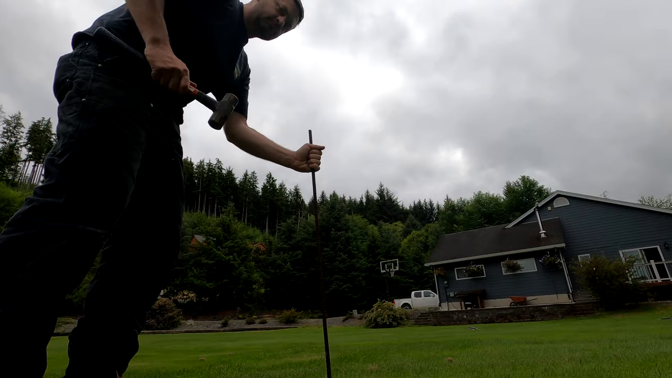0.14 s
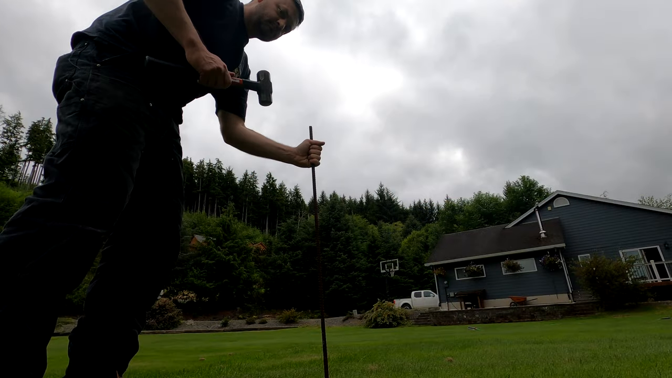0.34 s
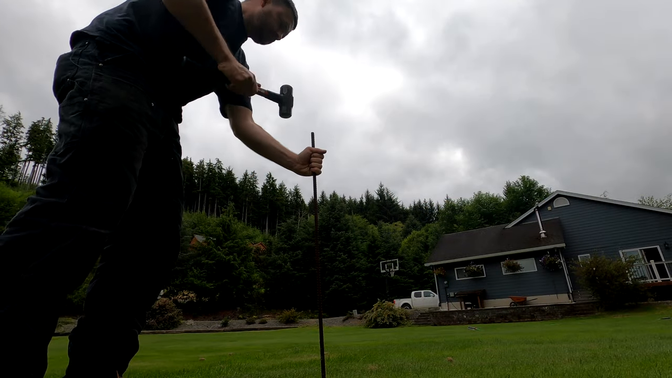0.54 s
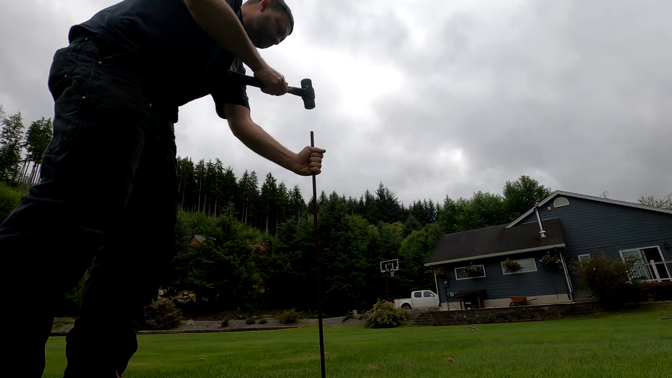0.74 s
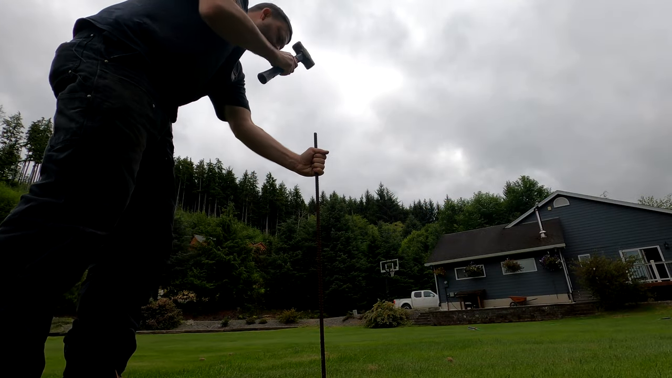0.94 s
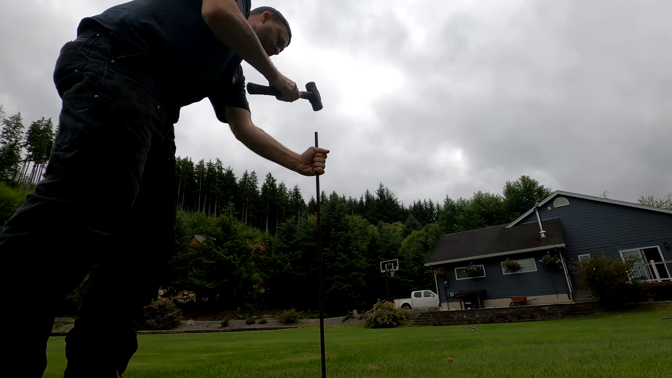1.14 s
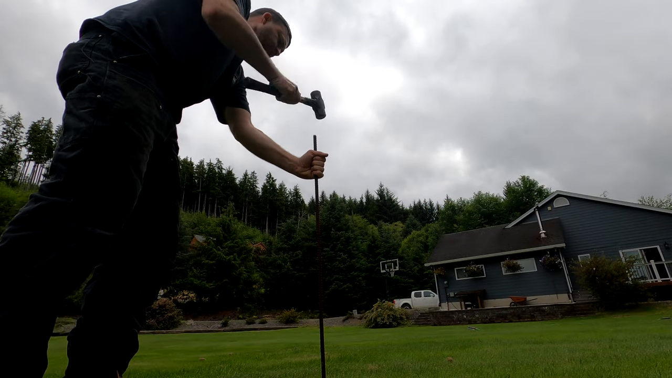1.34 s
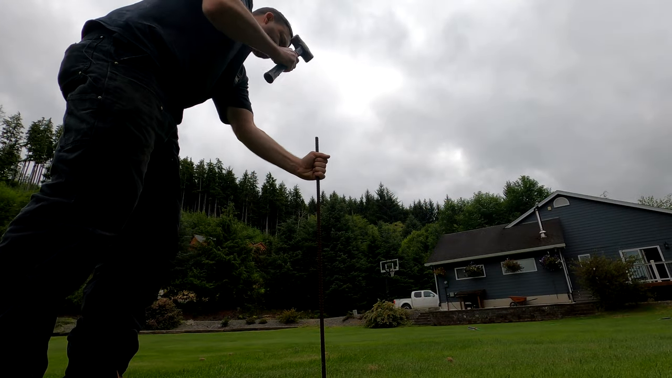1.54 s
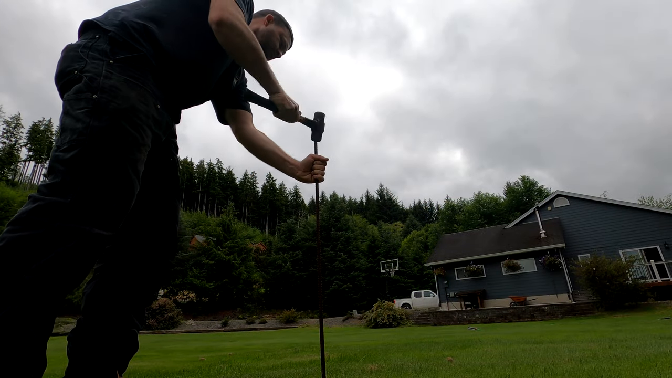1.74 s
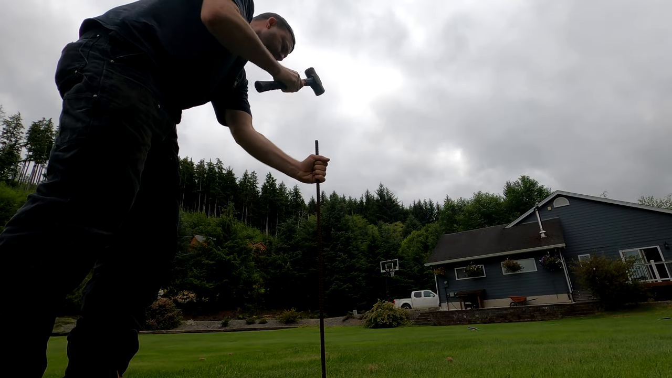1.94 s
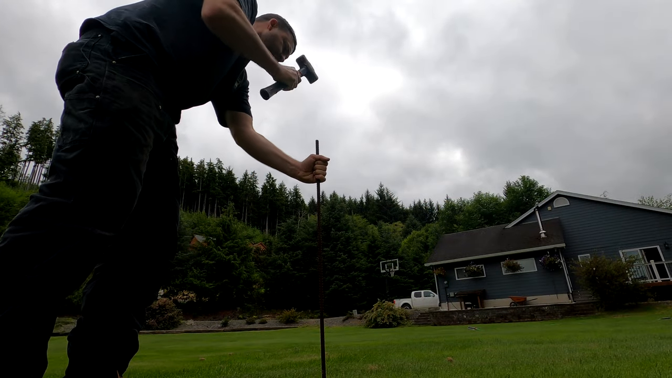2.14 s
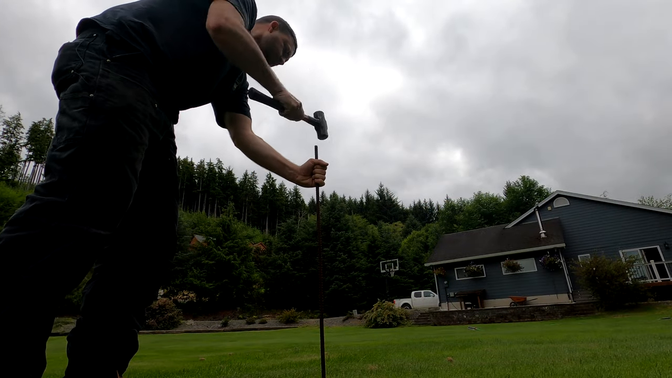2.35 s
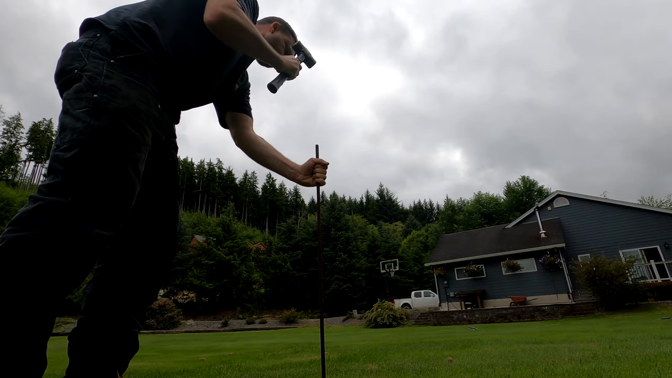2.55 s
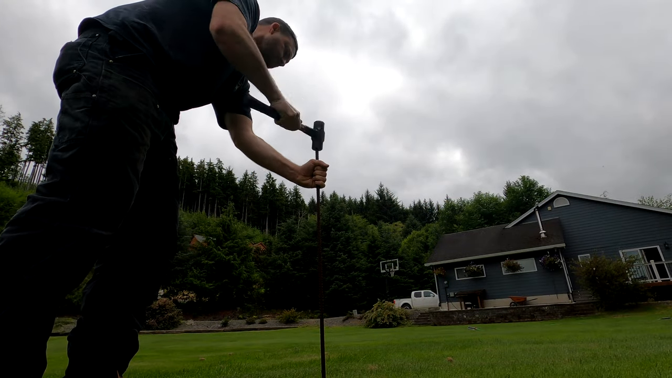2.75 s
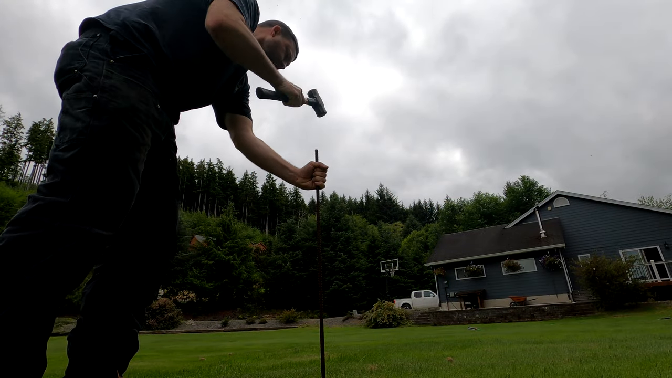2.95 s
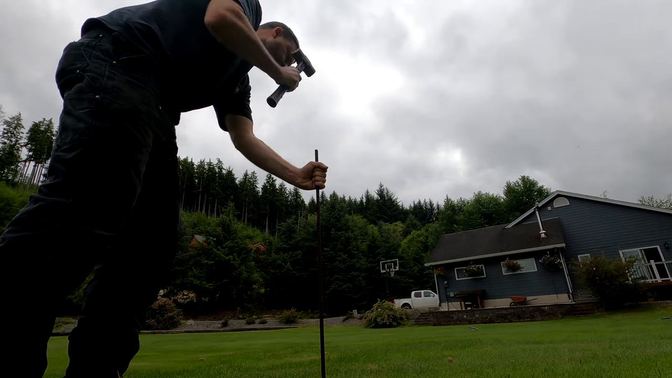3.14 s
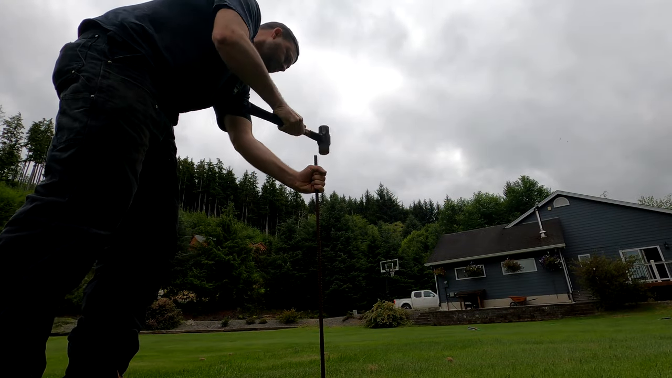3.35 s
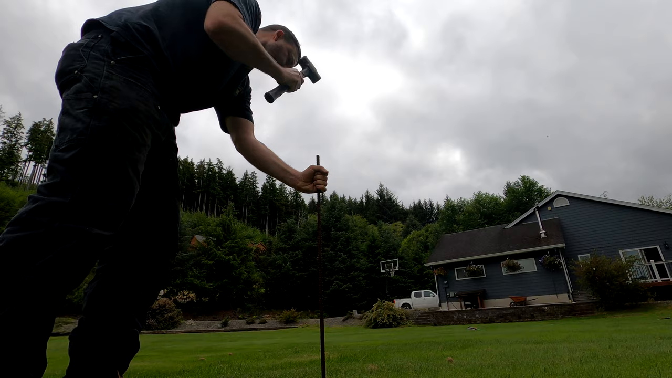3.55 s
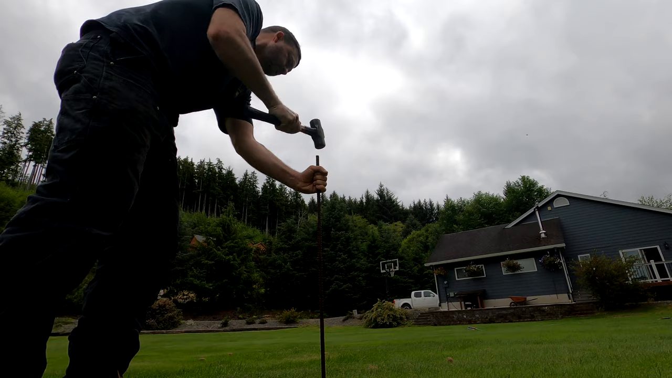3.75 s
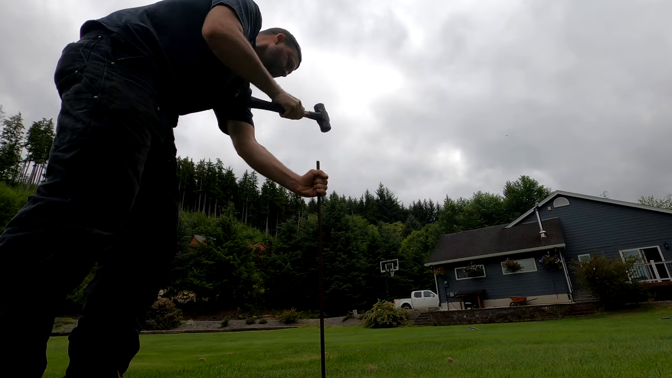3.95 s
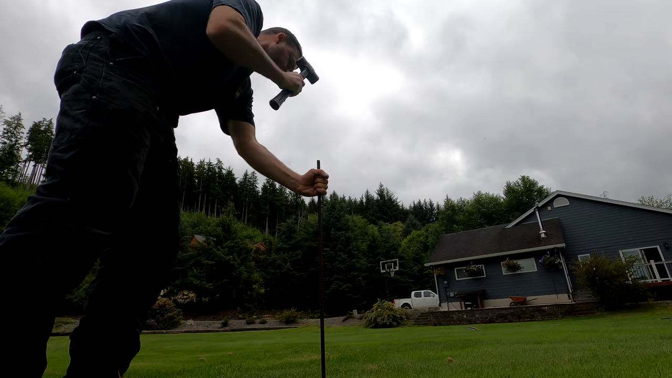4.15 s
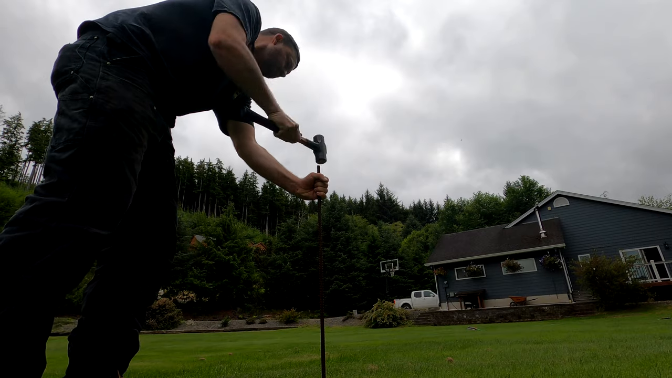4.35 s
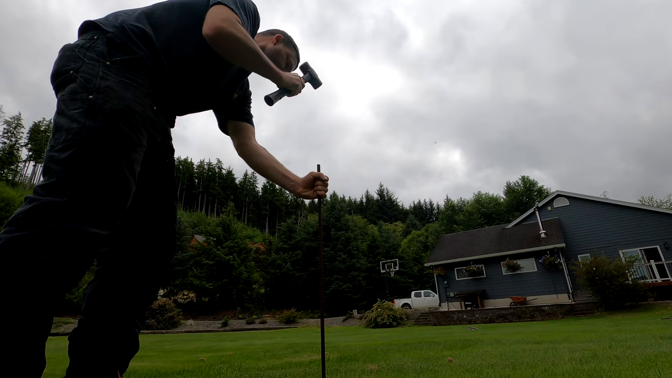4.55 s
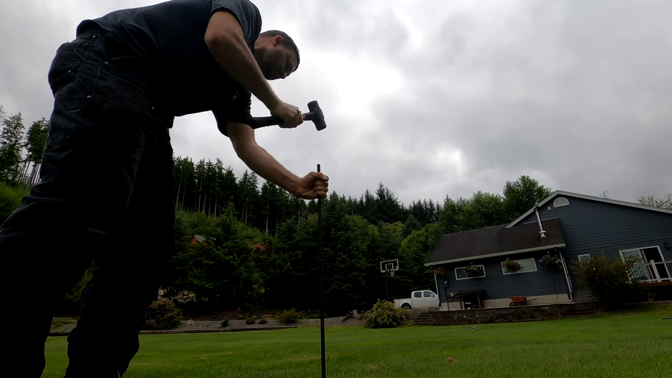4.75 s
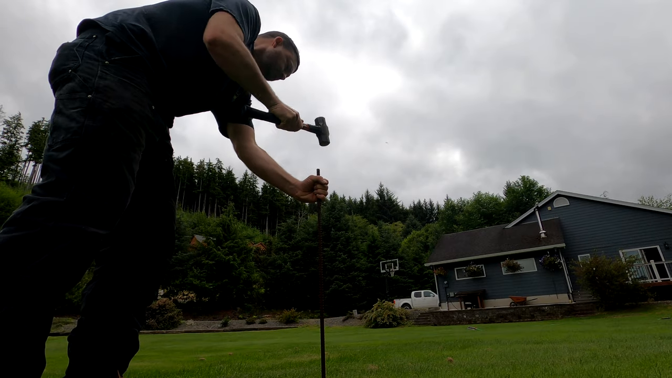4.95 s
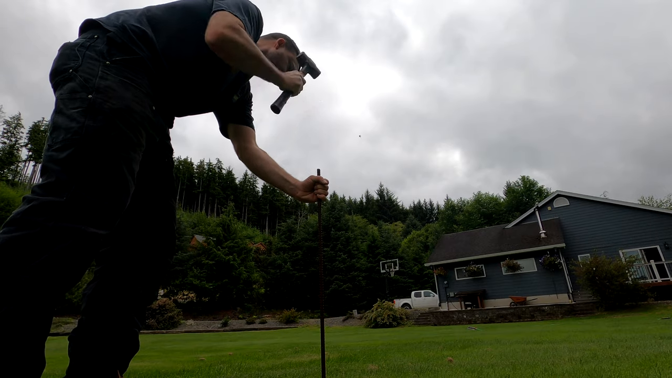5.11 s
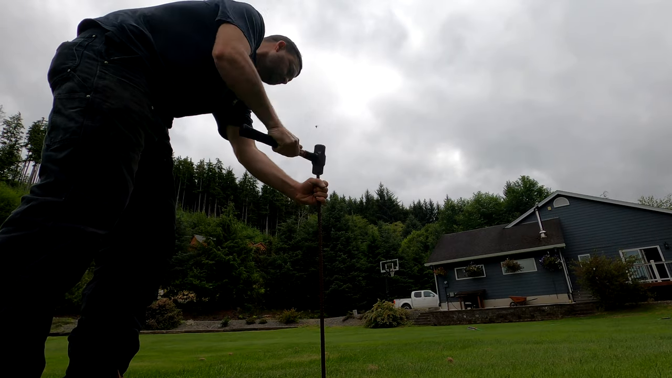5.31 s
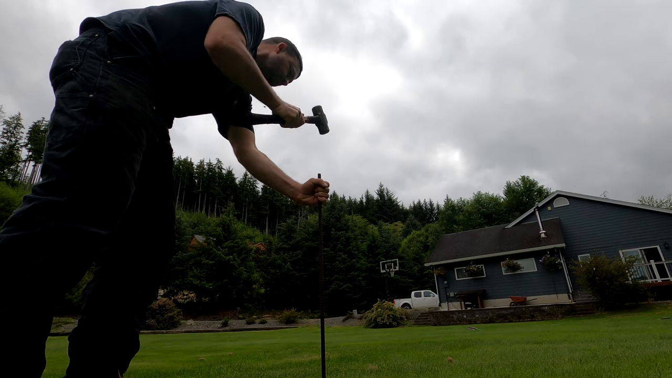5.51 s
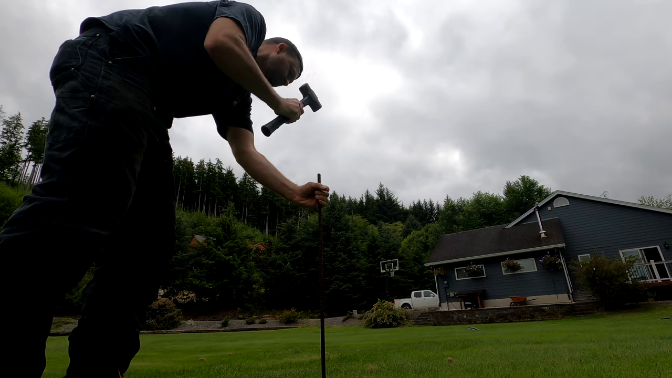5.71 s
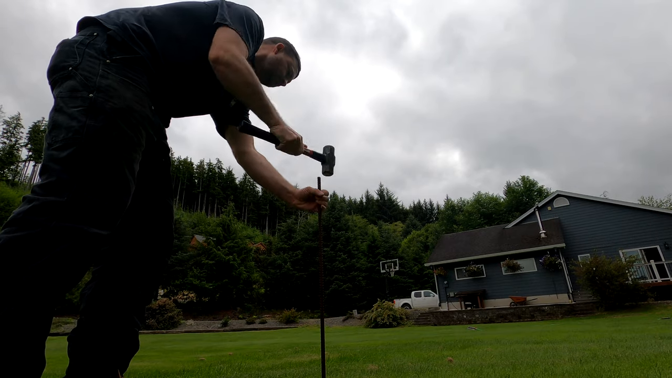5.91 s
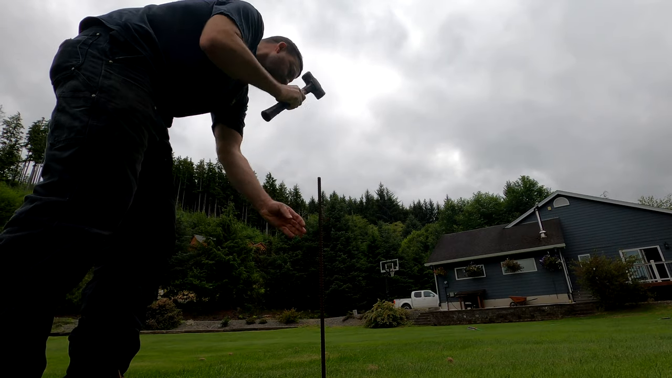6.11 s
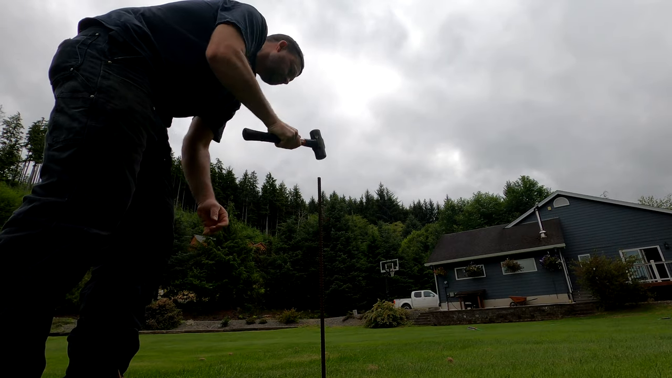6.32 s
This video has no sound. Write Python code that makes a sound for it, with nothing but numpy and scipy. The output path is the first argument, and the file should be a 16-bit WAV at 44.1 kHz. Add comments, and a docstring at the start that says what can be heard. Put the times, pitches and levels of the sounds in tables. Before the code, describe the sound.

Outdoors on a lawn, wind briefly buffets the microphone over the low hum of a distant mower. Then a small sledgehammer hits a steel bar ten times, about two blows a second. Each nearby blow is a sharp crack with a brief, bright ring, a tiny rebound and a soft thud in the soil, followed by a faint echo from a house. The wind rumble returns near the end.

```python
"""Hammering a steel bar into a lawn

A small sledgehammer strikes a hand-held bar and bounces on its tip: steel cracks and rings briefly,
the soil thuds, a house and trees send echoes back. A distant mower hums, a bird chirps once and wind
rumbles on the microphone. The recorder ducks its treble after each blow and widens from mono to stereo."""
import sys
import numpy as np
from scipy import signal
from scipy.io import wavfile

SR = 44100
rng = np.random.default_rng(int(sys.argv[2]) if len(sys.argv) > 2 else 0)


def master_out(mix):
    """Clip the mix to full scale and print it as 16-bit PCM to the path in sys.argv[1]."""
    frames = np.transpose(np.atleast_2d(mix))
    ceiling = np.clip(frames, -1, 1)
    pcm = np.round(ceiling * 32767).astype(np.int16)
    wavfile.write(sys.argv[1], SR, pcm)


N = 281119
TIME_S = np.arange(N) / SR

# Head lands on the tip: (time [s], strength [dB], crack brightness [dB], ring tilt [dB/oct],
# share in plane 1 [0-1], head ring [dB], thud [dB], low favoured pitch [Hz], high favoured pitch [Hz])
BLOWS = [(1.2813, -10, -6, -2, 0.53, -57, -19, 2690, 4900),
         (1.8152, -10, -2, -6.5, 0.41, -45, -19, 4100, 4830),
         (2.322, -10, -4, -4.5, 0.39, -53, -21, 4030, 4680),
         (2.8357, -9.5, -4, 0, 0.37, -42, -18, 2630, 6370),
         (3.3454, -11, -1, -3.5, 0.3, -44.5, -24.5, 2640, 8900),
         (3.8544, -10, -3.5, -6, 0.2, -52.5, -24, 3620, 6890),
         (4.3663, -10.5, 2.5, -9.5, 0.28, -53, -21.5, 3580, 6900),
         (4.8812, -11, 1.5, -9.5, 0.51, -52, -22, 4230, 4760),
         (5.3935, -9, -3.5, -4.5, 0.4, -50.5, -23.5, 3550, 6600),
         (5.893, -11, -5, 0.5, 0.65, -45, -27.5, 2810, 7400)]
# Head touches again: (time [s], crack [dB], ring [dB], thud [dB], low favoured pitch [Hz])
REBOUNDS = [(1.2954, -13.5, -17.5, -23, 2840), (1.3044, -22.5, -15, -41, 3530),
            (1.8309, -17, -10.5, -20, 3460), (2.335, -19.5, -10.5, -22.5, 3900),
            (2.3415, -28.5, -19, -25.5, 4030), (2.8484, -19.5, -12.5, -23, 4700),
            (2.8547, -20, -21.5, -27.5, 4100), (3.3576, -19, -15.5, -21, 3420),
            (3.3622, -26, -21, -25.5, 3570), (3.8655, -24, -10, -25.5, 3670), (4.3761, -25, -13, -26, 3660),
            (4.3803, -22, -28.5, -24, 3440), (4.4068, -40, -50.5, -35.5, 2470),
            (4.8912, -22, -14.5, -25.5, 3480), (5.4043, -17, -13.5, -24, 2980),
            (5.447, -33, -43, -36, 3590), (5.9021, -21.5, -21, -22, 3430)]
def hammer():
    """Blows and rebounds excite bar, contact noise and soil; blows also ring the solid head."""
    blow_s, blow_db, bright_db, tilt_db, plane, head_db, thud_db, low_hz, high_hz = np.transpose(BLOWS)
    bounce_s, bounce_crack_db, bounce_ring_db, bounce_thud_db, bounce_hz = np.transpose(REBOUNDS)
    touch_s = np.r_[blow_s, bounce_s]
    parent = np.searchsorted(blow_s, touch_s, side="right") - 1
    is_bounce = np.arange(len(touch_s)) >= len(blow_s)
    ring_db, crack_db = np.r_[blow_db, bounce_ring_db], np.r_[blow_db + 2, bounce_crack_db]
    # Rebounds crack duller but, glancing, ring the higher modes.
    bright_db = bright_db[parent] + 0.34 * is_bounce * (crack_db - blow_db[parent])
    tilt_db = tilt_db[parent] + 2 * is_bounce
    modes_db = bar_modes(ring_db, tilt_db, plane[parent], [np.r_[low_hz, bounce_hz], high_hz[parent]])
    since_s = np.abs(TIME_S - blow_s[np.maximum(np.searchsorted(blow_s, TIME_S) - 1, 0)])
    choke = np.exp(-(since_s / .03) ** 3)  # head and grip settle on the bar
    bar = choke * bar_ring(touch_s, modes_db, parent)
    contact = choke * rattle(touch_s, ring_db) + crack(touch_s, crack_db, bright_db, since_s)
    head = strike(hz=10000, t60_s=.2, levels_db=head_db, times_s=blow_s)
    return radiate(bar), radiate(contact), head, soil_thud(touch_s, np.r_[thud_db, bounce_thud_db])


# Bending modes of the ribbed bar: (frequency [Hz])
MODE_HZ = [2390, 2685, 2955, 3460, 3560, 4030, 4185, 4685, 4845, 5370, 5535, 6300, 6880, 7095, 7700, 7940,
           8590, 8800, 9740, 10700, 11700, 12300, 13750, 14800]
# Same order: (level [dB], free t60 [s], plane of swing [0 or 1])
MODES = [(-5.5, 0.099, 1), (-1.5, 0.04, 0), (-6.5, 0.056, 1), (-9, 0.15, 0), (-7.5, 0.077, 1),
         (-3, 0.067, 0), (-8, 0.083, 1), (-4, 0.045, 0), (-8.5, 0.074, 1), (-14, 0.066, 0), (-10, 0.12, 1),
         (-6, 0.14, 1), (-12, 0.11, 0), (-8.5, 0.072, 1), (-13, 0.037, 0), (-14, 0.068, 1), (-20, .08, 0),
         (-12, 0.11, 1), (-18.5, 0.51, 1), (-22, 0.034, 1), (-24, 0.025, 1), (-21.5, 0.078, 0),
         (-19.5, .07, 1), (-32, .06, 1)]
def bar_modes(ring_db, tilt_db, plane, favoured_hz, favour_db=5.5, favour_oct=.16):
    """Mode levels per contact, set by plane of swing, tilt and two favoured pitches."""
    levels_db = rng.normal(0, 1.5, (len(ring_db), len(MODES)))  # no two contacts hit the same spot
    for k, (hz, (db, _, mode_plane)) in enumerate(zip(MODE_HZ, MODES)):
        share = plane if mode_plane else 1 - plane
        colour_db = 20 * np.log10(share) + tilt_db * np.log2(hz / 5000)
        for centre_hz in favoured_hz:
            colour_db += favour_db * np.exp(-(np.log2(hz / centre_hz) / favour_oct) ** 2)
        levels_db[:, k] += ring_db - 1.5 + db + colour_db
    return levels_db


# Damping by hand and soil: (time [s], share of free t60 at 3560 Hz [0-1])
GRIP = [(1.2, 0.91), (3.4, 0.63), (3.85, 0.43), (4.9, 0.4), (5.4, 0.62), (5.9, 0.55)]
def bar_ring(touch_s, modes_db, parent, detune=.0027, stifle_db=-5.5, stifle_s=.0017, spread_s=.0007):
    """Each contact rings the bending modes; later touches of the same blow stifle them."""
    t, out = np.arange(int(.09 * SR)) / SR, np.zeros(N + SR)
    pitches_hz = np.array(MODE_HZ) * (1 + detune * rng.standard_normal(modes_db.shape))  # grip, depth
    free_t60_s, sign = np.array(MODES)[:, 1:2], (-1) ** np.arange(len(MODES))
    for start_s, db, hz, blow in zip(touch_s, modes_db, pitches_hz[:, :, None], parent):
        held = np.interp(start_s, *np.transpose(GRIP)) ** (3560 / hz)  # high modes feel the grip less
        decay = amp(-60 * t / (free_t60_s * held))
        ring = (sign * amp(db)) @ (decay * np.sin(2 * np.pi * hz * t))
        for later_s in touch_s[(touch_s > start_s) & (parent == blow)]:
            ring *= amp(stifle_db * np.clip((t + start_s - later_s) / stifle_s, 0, 1))
        i = int(start_s * SR)
        out[i:i + len(t)] += ring * (1 - np.exp(-t / spread_s))  # waves take time to fill the bar
    return out[:N]


# Steel contact, dull and bright parts: (frequency [Hz], level [dB], t60 [s])
CRACK_DULL = [(1300, 2, .007), (1650, 2, .006)]
CRACK_BRIGHT = [(3460, 5, .005), (4550, 5, .005), (6560, -3, 0.0048), (9585, -6, .006),
                (13500, -15.5, .003)]
def crack(touch_s, crack_db, bright_db, since_s, rise_s=63e-6):
    """Steel meets steel: resonances that die within milliseconds."""
    dull = sum(strike(hz, t60, crack_db + db, touch_s) for hz, db, t60 in CRACK_DULL)
    bright = sum(strike(hz, t60, crack_db + bright_db + db, touch_s) for hz, db, t60 in CRACK_BRIGHT)
    return (butter(dull, 5000, "low") + bright) * (1 - np.exp(-(since_s / rise_s) ** 2))


# Chatter spectrum: (frequency [Hz], relative density [dB])
RATTLE_SPECTRUM = [(600, -19), (1200, -6.5), (2000, -8.5), (3500, -1.5), (5000, -9.5), (7500, -8.5),
                   (10000, -17), (12500, -27), (15900, -36)]
def rattle(touch_s, ring_db, t60_s=.065):
    """The head chatters on the tip: a dying noise burst per contact."""
    envelope = signal.lfilter([1], [1, -amp(-60 / (t60_s * SR))], impulses(touch_s, ring_db - 19))
    return envelope * band_noise(RATTLE_SPECTRUM, flicker_db=3, rate_hz=20)[0]


# Soil resonances: (frequency [Hz], level [dB], t60 [s])
SOIL_MODES = [(74.2, 4, 0.03), (167, 2, 0.065), (255, -10, 0.056), (354, -8.5, 0.038), (491, -12, 0.012),
              (765, -13.5, .012)]
def soil_thud(touch_s, thud_db):
    """Soft soil takes the blow and rounds the push."""
    thud = sum(strike(hz, t60, thud_db + db, touch_s) for hz, db, t60 in SOIL_MODES)
    return butter(thud, [35, 900])


def radiate(steel, lawn_delay_s=.0018, lawn_db=-18):
    """A thin bar radiates no bass, the contact is too long for the very top; the lawn reflects."""
    direct = butter(steel, [1405, 19000], order=3)
    return direct + amp(lawn_db) * np.roll(direct, int(lawn_delay_s * SR))


# House and garage faces: (delay [s], level [dB])
WALL_ECHOES = [(0.0706, -28.5), (0.087, -26.5), (.098, -43), (.112, -29)]
def echoes(steel, trees_delay_s=.094, trees_db=-56.5, trees_t60_s=.51):
    """Walls reflect the treble; hedges and trees scatter it into a dying tail."""
    t = np.arange(SR // 2) / SR
    scatter = amp(trees_db - 60 * t / trees_t60_s) * rng.standard_normal((2, len(t)))
    response = np.pad(scatter, ((0, 0), (int(trees_delay_s * SR), 0)))
    for delay_s, db in WALL_ECHOES:
        response[:, int(delay_s * SR)] += amp(db)
    treble = butter(np.gradient(steel), [2200, 11000], order=3)  # siding scatters highs best
    return signal.fftconvolve(treble[None], response)[:, :N]


# Mower moving about: (time [s], level [dB], lift of order 6 [dB], of orders 7-8 [dB], of order 10 [dB])
MOWER_LEVELS = [(0, -36, 9, 6, 11), (.26, -37, 3, 4, 1), (.49, -41.5, 3, 9, 20), (.89, -38, 4, 3, -1.5),
                (2.3, -40.5, -2, -3, -2.5), (4.8, -45.5, 0, -1, 8), (5.35, -43, 0, 5, 15),
                (5.6, -46, 0, -1, 18.5), (5.95, -42, -1, -3, 12.5), (6.37, -45, -4, -4, 2.5)]
# Engine speed: (time [s], firing rate [Hz])
FIRING_RATE = [(0, 26.7), (.26, 25.5), (.49, 25), (.89, 26.5), (1.3, 26.3), (4.4, 26.15), (5.2, 26.7),
               (6.37, 26.3)]
# Exhaust harmonics: (order [1], level [dB])
EXHAUST_ORDERS = [(1, -13.5), (2, -16), (3, -16), (4, -15.5), (5, 0.5), (6, -6), (7, -12), (8, -7.5),
                  (9, -15.5), (10, -25.5), (11, -27), (12, -30.5), (13, -33.5)]
def mower():
    """Orders of the firing rate, each wavering on its way through the air."""
    level_db, sixth_db, seventh_eighth_db, tenth_db = curves(MOWER_LEVELS)
    lift_db = {6: sixth_db, 7: seventh_eighth_db, 8: seventh_eighth_db, 10: tenth_db}
    phase = 2 * np.pi * np.cumsum(curves(FIRING_RATE)[0]) / SR
    hum = 0
    for order, db in EXHAUST_ORDERS:
        peak = np.sqrt(2) * amp(level_db + db + lift_db.get(order, 0) + 1.6 * drift(7.4))
        hum += peak * np.sin(order * phase + rng.uniform(0, 2 * np.pi) + .082 * drift(4.6))
    return hum


# Wind on the ports: (time [s], level before tilt [dB])
WIND_LEVEL = [(0, -37), (.37, -23), (1.06, -55.5), (1.79, -43.5), (2.13, -51.5), (2.89, -41.5), (3.48, -39),
              (3.73, -42.5), (4.63, -45), (5.35, -37), (5.5, -25), (5.89, -44), (6.03, -33), (6.37, -24.5)]
# Rumble spectrum: (frequency [Hz], relative density [dB])
WIND_SPECTRUM = [(14, -11.5), (25, -4.5), (55, 2.5), (100, -4.5), (170, -14), (300, -33.5), (640, -39.5)]
def wind_rumble(breeze_db=-41):
    """Wind rumbles on the microphone ports, darker when stronger."""
    level_db, = curves(WIND_LEVEL)
    tilt_db_oct = 1.44 - .3262 * (level_db - breeze_db)
    return amp(level_db) * band_noise(WIND_SPECTRUM, flicker_db=2.5, rate_hz=10, tilt_db_oct=tilt_db_oct)


# Single gusts: (time [s], swing [dB], pitch [Hz], left minus right at full width [dB], edge [dB])
GUSTS = [(0.204, -11, 94.2, 2, -42), (0.226, -15.5, 136, 0, -51), (0.349, -13, 78.1, -3, -41),
         (0.439, -11, 43.4, -2, -43), (0.5, -15.5, 26.9, -3, -46), (0.739, -17, 159, 0, -45),
         (0.8, -19, 26.9, 0, -56), (2.953, -23, 129, 7, -53), (3.3, -25.5, 40.4, -24, -58),
         (4.107, -18, 48.4, 2.5, -50), (5.322, -15.5, 80.7, -19, -28), (5.348, -15, 60, -20, -34),
         (5.5, -22, 59.2, -14, -65), (5.998, -21, 43.1, 11, -20), (6.271, -23, 132, -14, -58)]
def buffets(t60_cycles=2.46, edge_hz=150, edge_t60_s=.024):
    """Each gust pushes a port and lets it swing back a cycle or two."""
    out = 0
    for s, db, hz, pan_db, edge_db in GUSTS:
        push = strike(hz, t60_cycles / hz, db, [s]) + strike(edge_hz, edge_t60_s, edge_db, [s])
        out += push * amp([[pan_db / 2], [-pan_db / 2]])
    return butter(out, [15, 500])


# Outdoor hiss: (time [s], level [dB])
AIR_LEVEL = [(0, -44), (1.37, -47), (1.97, -50), (6.37, -51)]
# Hiss spectrum: (frequency [Hz], relative density [dB])
AIR_SPECTRUM = [(88, -30.5), (150, -6.5), (212, -14.5), (238, -11), (441, -20.5), (545, -23.5), (900, -29),
                (1130, -27), (5300, -41), (8410, -56.5), (11900, -91), (15000, -91)]
def outdoor_air():
    """Distant, nearly steady hiss."""
    return amp(curves(AIR_LEVEL)[0]) * band_noise(AIR_SPECTRUM, flicker_db=.3, rate_hz=6)


# Rushing spectrum: (frequency [Hz], relative density [dB])
RUSH_SPECTRUM = [(590, -31), (1000, -8), (1210, -1), (1390, -4.5), (2190, -5), (3400, 4), (3680, -5),
                 (8910, -20), (15000, -55)]
def opening_rush(level_db=-52.5, hold_s=.22, fade_db_per_s=61.5):
    """A bright rushing holds, then fades."""
    envelope = amp(level_db - fade_db_per_s * np.maximum(TIME_S - hold_s, 0))
    return envelope * band_noise(RUSH_SPECTRUM, flicker_db=-.8, rate_hz=8.3)[0]


# Far bird: (start [s], length [s], start pitch [Hz], end pitch [Hz], level [dB])
BIRD_CHIRP = (2.143, .12, 8150, 7750, -64)
def bird():
    """One thin falling chirp, loudest near its start, a little hoarse."""
    start_s, length_s, from_hz, to_hz, db = BIRD_CHIRP
    progress = np.clip((TIME_S - start_s) / length_s, 0, 1)
    envelope = np.sin(np.pi * progress ** .3) ** 2
    hz = from_hz + (to_hz - from_hz) * progress ** .5
    return amp(db + 3 * drift(60)) * envelope * np.sin(2 * np.pi * np.cumsum(hz) / SR)


def amp(db):
    """Decibels to gain."""
    return 10 ** (np.asarray(db) / 20)


def butter(x, hz, kind="band", order=2):
    """Maximally flat filter."""
    return signal.sosfilt(signal.butter(order, hz, kind, fs=SR, output="sos"), x)


def curves(rows):
    """Columns of a time table at every sample."""
    times_s, *columns = np.transpose(rows)
    return [np.interp(TIME_S, times_s, column) for column in columns]


def drift(rate_hz, hop=40):
    """Slow random wander, rms 1."""
    pole = np.exp(-2 * np.pi * rate_hz * hop / SR)
    slow = signal.lfilter([1], [1, -2 * pole, pole ** 2], rng.standard_normal(N // hop + 2002))[2000:]
    return np.interp(np.arange(N) / hop, np.arange(len(slow)), slow / np.sqrt(np.mean(slow ** 2)))


def impulses(times_s, levels_db):
    """One-sample clicks."""
    clicks = np.full(N, 1e-18)
    clicks[(np.asarray(times_s) * SR).astype(int)] = amp(levels_db)
    return clicks


def strike(hz, t60_s, levels_db, times_s):
    """One damped mode, struck at each time."""
    r, w = amp(-60 / (t60_s * SR)), 2 * np.pi * hz / SR
    return signal.lfilter([0, np.sin(w)], [1, -2 * r * np.cos(w), r * r], impulses(times_s, levels_db))


def band_noise(spectrum, flicker_db, rate_hz, tilt_db_oct=0):
    """Two channels of flickering half-octave noise bands, rms 1 before the tilt."""
    hz, db = np.transpose(spectrum)
    edges_hz = hz[0] * 2 ** np.arange(0, np.log2(hz[-1] / hz[0]) + .01, .5)
    white, common, bands = rng.standard_normal((2, 2, N)), drift(rate_hz / 2), []
    for k, (low, high) in enumerate(zip(edges_hz, edges_hz[1:])):
        level_db = np.interp(np.log(low * high) / 2, np.log(hz), db)
        gain = amp(level_db + flicker_db * (common + drift(rate_hz)))
        bands.append(gain * butter(white[k % 2], [low, high]))
    return sum(band * amp(tilt_db_oct * k / 2) for k, band in enumerate(bands)) / np.std(sum(bands))


def scene():
    """All sources mixed as mid and side, returned as left and right."""
    bar, contact, head, thud = hammer()
    steel = bar + contact
    wind, air, rush = wind_rumble(), outdoor_air(), opening_rush()
    echo = echoes(bar + amp(-8) * contact)  # the bar's flank faces the walls; contact noise spreads
    hum = mower()
    mid = steel + head + thud + echo[0] + hum + wind[0] + air[0] + rush + bird()
    side = amp(-10.5) * thud + amp(-.5) * echo[1] + amp(-24.5) * hum + amp(-6.5) * wind[1]
    side += amp(-14) * air[1] + amp(6) * np.diff(air[1], prepend=0)
    side -= .105 * steel + np.gradient(steel + head)  # louder and earlier at the right port
    return np.array([mid + side, mid - side]) + buffets()


WIDEN_FROM_S, WIDEN_RAMP_S, CUTOFF_HZ = 2.1, 4.7, 16450
DUCK_SPLIT_HZ, DUCK_THRESHOLD_DB, DUCK_SLOPE, DUCK_MAX_DB = 330, -35.5, .2, 10
DUCK_ATTACK_S, DUCK_RELEASE_DB_PER_S = .014, 354
def record(dry):
    """The recorder fades in the side signal, ducks treble after peaks, clips and cuts the top."""
    width = np.clip((TIME_S - WIDEN_FROM_S) / WIDEN_RAMP_S, 0, 1)
    mid, side = (dry[0] + dry[1]) / 2, width * (dry[0] - dry[1]) / 2
    stereo = np.array([mid + side, mid - side])
    bass, treble = [butter(butter(stereo, DUCK_SPLIT_HZ, kind), DUCK_SPLIT_HZ, kind)
                    for kind in ("low", "high")]  # two passes: the bands sum flat
    peak_db = 20 * np.log10(np.abs(treble).max(axis=0) + 1e-9)
    fall_db = DUCK_RELEASE_DB_PER_S * TIME_S
    held_db = np.maximum.accumulate(peak_db + fall_db) - fall_db
    duck_db = np.clip(DUCK_SLOPE * (held_db - DUCK_THRESHOLD_DB), 0, DUCK_MAX_DB)
    pole = np.exp(-1 / (DUCK_ATTACK_S * SR))
    duck_db = signal.lfilter([(1 - pole) ** 2], [1, -2 * pole, pole ** 2], duck_db)
    ducked = np.clip(bass + treble * amp(-duck_db), -1, 1)
    return signal.sosfilt(signal.cheby2(16, 100, CUTOFF_HZ, fs=SR, output="sos"), ducked)


dry = scene()
out = record(dry)
master_out(out)
```